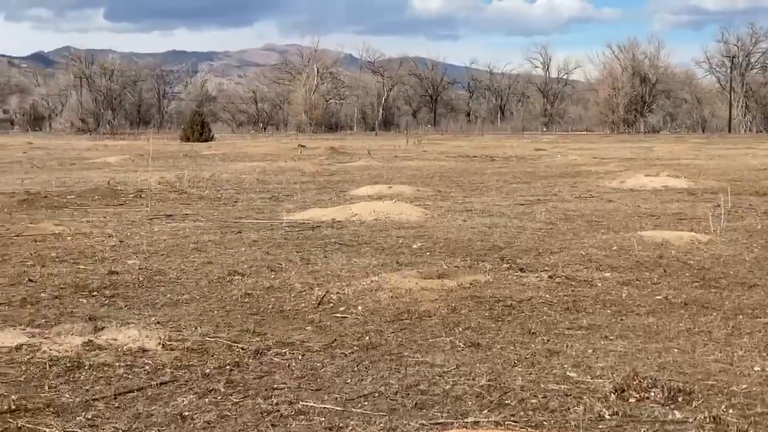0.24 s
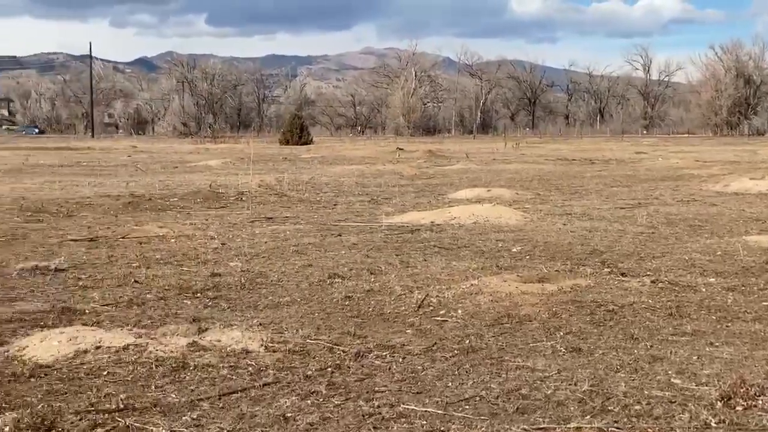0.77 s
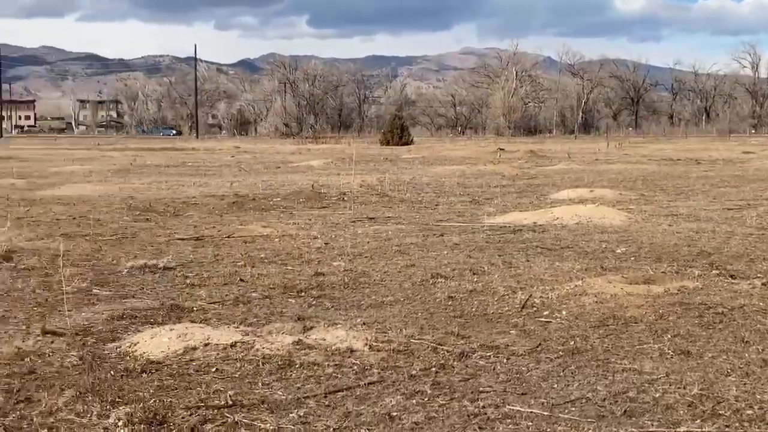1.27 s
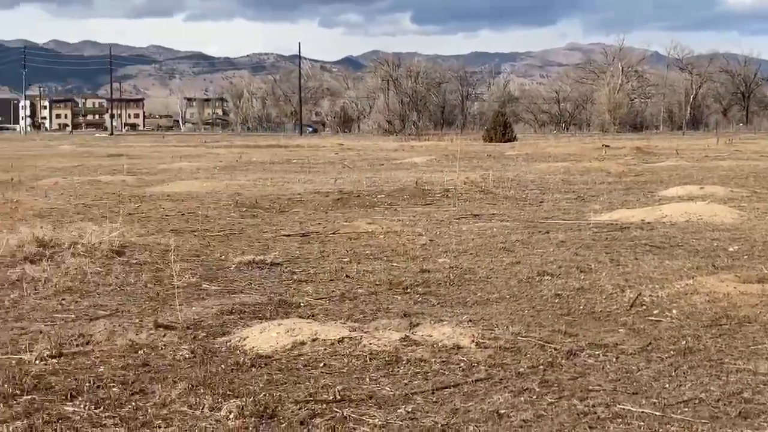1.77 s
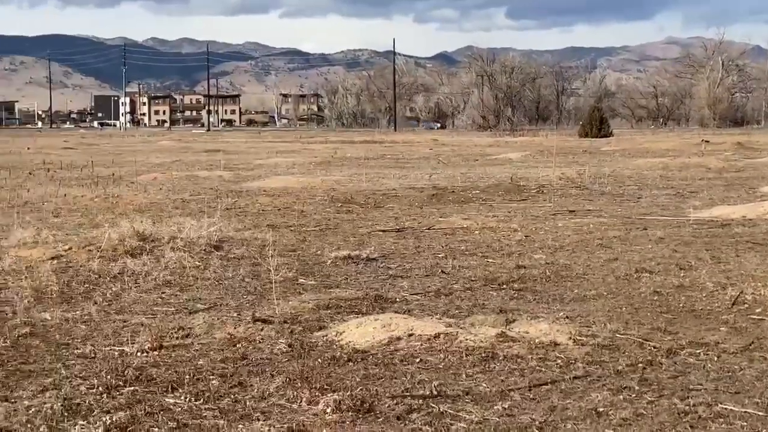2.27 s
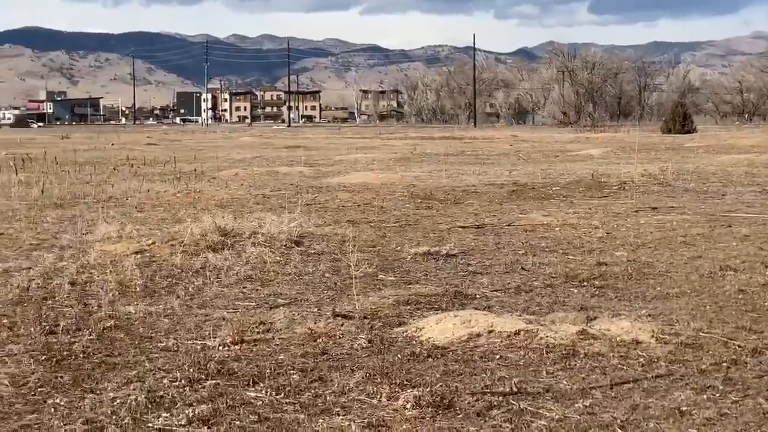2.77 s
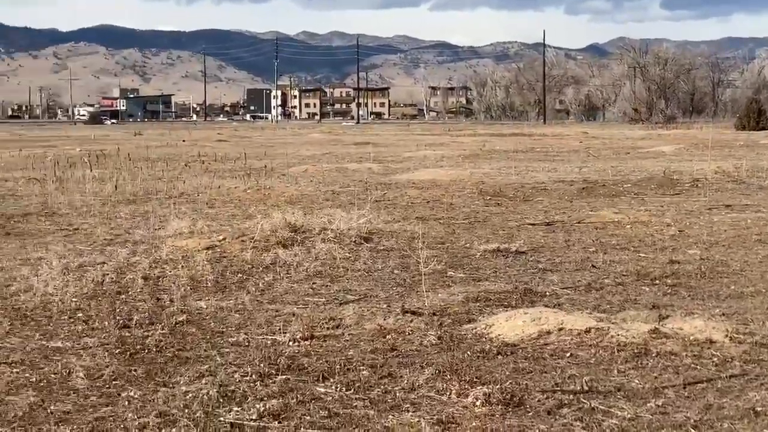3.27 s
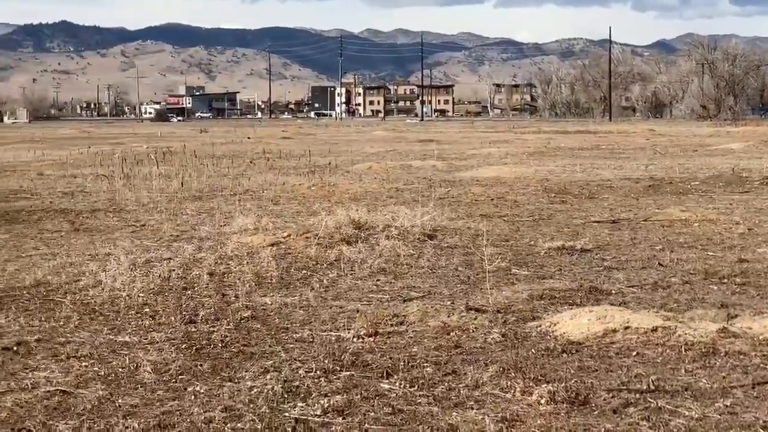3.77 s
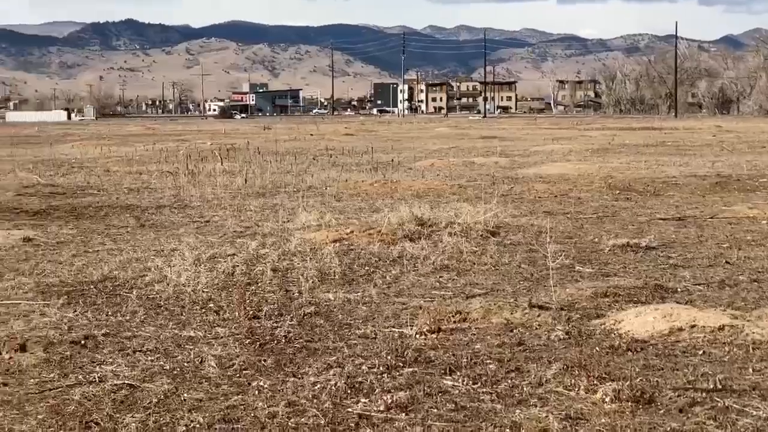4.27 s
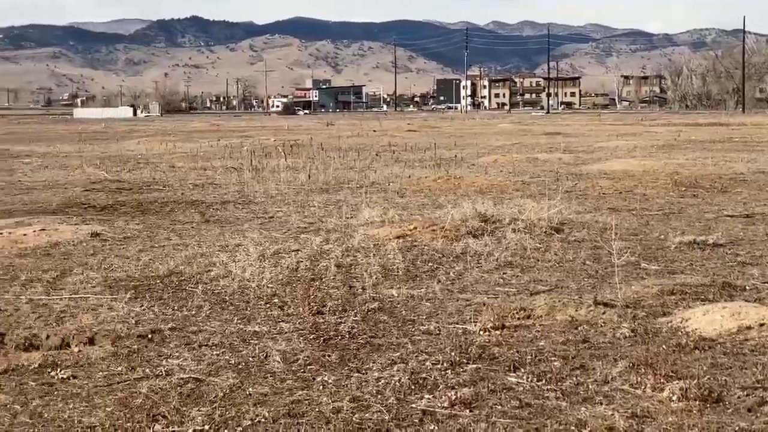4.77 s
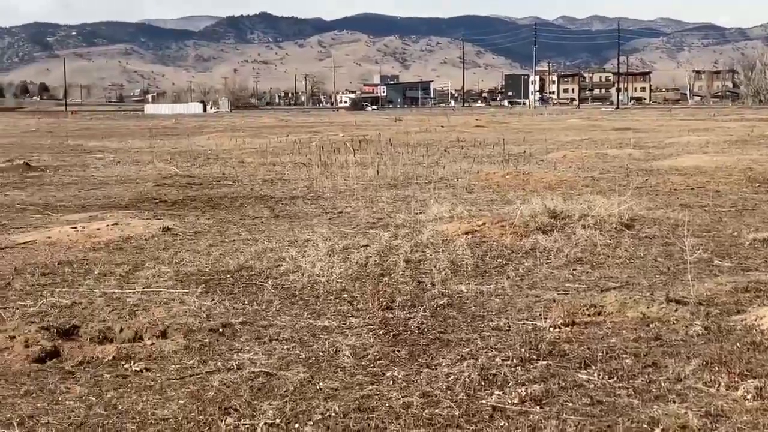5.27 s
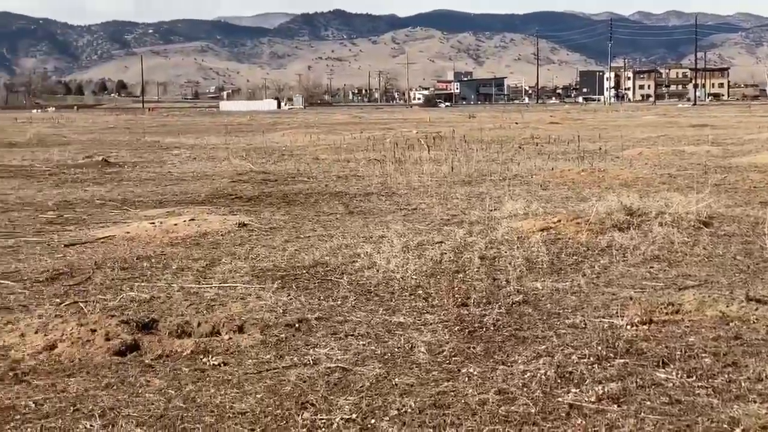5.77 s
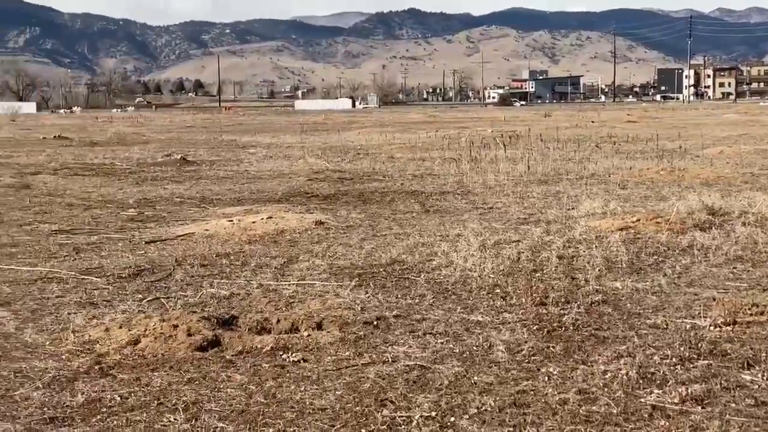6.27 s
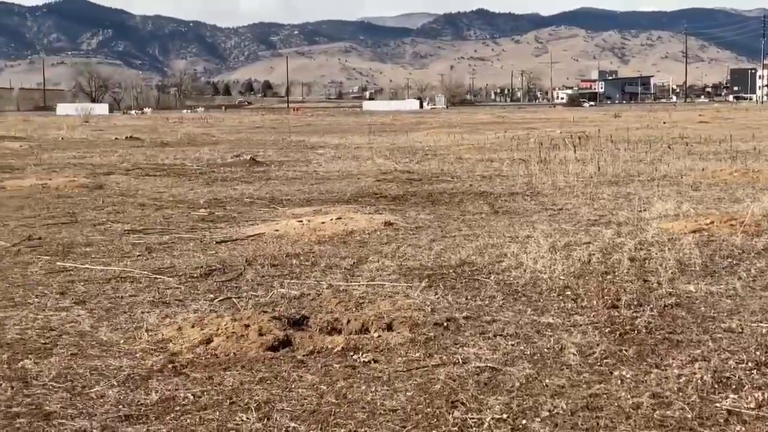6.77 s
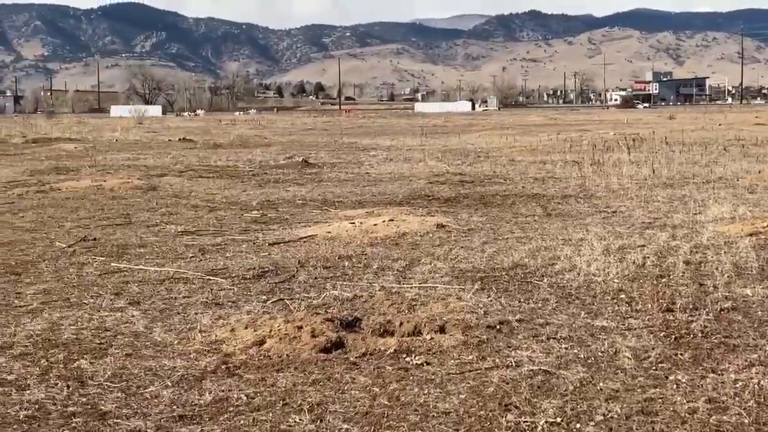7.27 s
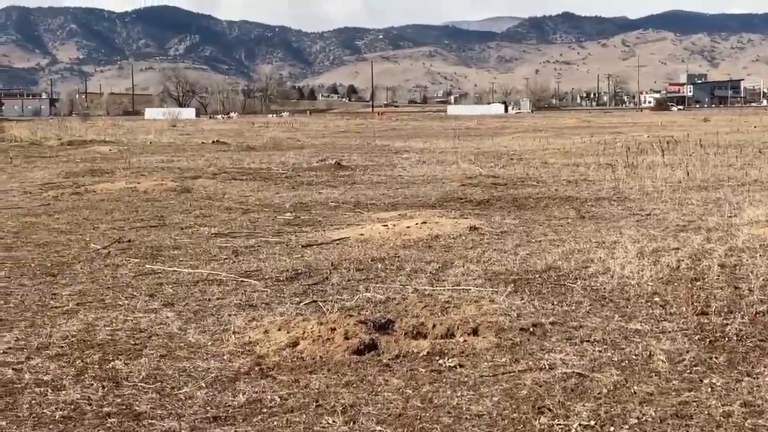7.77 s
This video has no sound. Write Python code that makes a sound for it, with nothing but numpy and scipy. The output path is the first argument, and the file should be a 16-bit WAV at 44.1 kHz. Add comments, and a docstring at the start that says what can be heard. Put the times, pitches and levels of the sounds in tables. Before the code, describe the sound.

A prairie dog gives twelve short, high two-note alarm barks over faint distant traffic, a low engine rumble that fades, and wind thumps on the microphone.

```python
"""Prairie dog alarm in an open field

A prairie dog barks two-note alarm calls, built from harmonics; far trees send back a faint noisy echo.
Coloured noise makes the distant traffic, low tones and rumble the engine, short gliding tones the chirps.
Wind reaches the microphone as low, lumpy noise and short thumps.
A low cut slides up and down and thins the bass."""
import sys
import numpy as np
from scipy import signal
from scipy.fft import rfft, irfft, next_fast_len
from scipy.io import wavfile
from scipy.ndimage import uniform_filter1d

SR = 44100
rng = np.random.default_rng(int(sys.argv[2]) if len(sys.argv) > 2 else 0)


def linear_from_db(decibels):
    """Turn decibels (scalar or array-like) into linear amplitude factors; 0 gives 1."""
    return 10 ** (np.asarray(decibels, float) / 20)


def materialize(psi):
    """Save the field psi as 16-bit PCM at rate SR to the path in sys.argv[1].

    A 1-D psi becomes a single channel; in a 2-D psi each row is a channel.
    """
    bounded = np.clip(np.atleast_2d(psi).T, -1, 1)
    quanta = np.round(bounded * 32767).astype(np.int16)
    wavfile.write(sys.argv[1], SR, quanta)


N = 354123  # length of the scene in samples


def rms_one(x):
    """Scale a signal to an rms (average strength) of 1."""
    return x / np.sqrt(np.mean(np.abs(x) ** 2) + 1e-20)


def in_time(rows, t=None):
    """Join the rows of a table with straight lines; read each column at every sample, or at times t."""
    if t is None:
        t = np.arange(N) / SR
    times, *columns = np.transpose(rows)
    return [np.interp(t, times, column) for column in columns]


def at_hz(points, hz):
    """Read a spectrum table on a log-frequency axis."""
    table_hz, values = np.array(points).T
    return np.interp(np.log(hz), np.log(table_hz), values)


def drift(rate_hz, size=N):
    """Slow random wandering with an rms of 1: noise smoothed twice by a one-pole low-pass."""
    r = np.exp(-2 * np.pi * rate_hz / SR)
    noise = rng.standard_normal(size + SR)
    # the first second lets the filter settle and is thrown away
    return rms_one(signal.lfilter([1], [1, -2 * r, r * r], noise)[SR:])


def band(x, low_hz, high_hz):
    """Keep the frequencies between two edges (second-order band-pass design)."""
    return signal.sosfilt(signal.butter(2, [low_hz, high_hz], "band", fs=SR, output="sos"), x)


def jitter(width_hz, size):
    """Complex noise with a steep edge: a band of that half-width around any tone it multiplies."""
    white = rng.standard_normal((2, size + 400))
    low_pass = signal.butter(4, width_hz, fs=SR, output="sos")
    real, imaginary = signal.sosfilt(low_pass, white)[:, 400:]
    return rms_one(real + 1j * imaginary)


def traffic():
    """Distant road hum: smooth stereo noise, coloured and spread by frequency, swelling a little."""
    # loudness and place of the road: (time [s], level [dB], left minus right [dB])
    road_path = [(0.0, -61.5, -1.5), (0.7, -63.5, -1), (1.32, -63, -1.5), (2.84, -63, -1), (3.6, -62.5, 1),
                 (4.9, -65, 0.0), (5.5, -64, 0), (6.91, -66, 0), (7.54, -67, -1), (8.03, -66.5, -0.5)]
    # colour of the road noise: (frequency [Hz], relative level per Hz [dB])
    road_colour = [(60, -29.5), (130, -12.5), (200, -10), (330, -16.5), (540, -17), (820, -12), (1100, -17),
                   (1700, -19.5), (2110, -32), (2450, -42), (2900, -51.5), (7100, -56.5), (8500, -60.5),
                   (10200, -55.5), (11500, -83.5)]
    # how alike the two channels are: (frequency [Hz], likeness [1 = same, 0 = unrelated])
    likeness = [(130, 0.94), (300, 0.56), (600, 0.1), (850, 0.34), (1400, 0.17), (2200, 0.31), (3500, 0.7),
                (7000, 0.72), (9000, 0.027)]
    level_db, pan_db = in_time(road_path)
    size = next_fast_len(N)
    hz = np.maximum(np.arange(size // 2 + 1) * SR / size, 1)
    alike = np.clip(at_hz(likeness, hz), -1, 1)
    shares = np.sqrt([1 + alike, 1 - alike])
    spectra = rfft(rng.standard_normal((2, size))) * linear_from_db(at_hz(road_colour, hz)) * shares
    mid, side = irfft(spectra, size)[:, :N]
    swell_db = 0.66 * drift(6.4)
    gain = linear_from_db(level_db + swell_db + pan_db * [[.5], [-.5]])
    # the level refers to the shared part between 500 and 1300 Hz
    return gain * (mid + side * [[1], [-1]]) / np.std(band(mid, 500, 1300))


def engine():
    """Low multiples of the firing rate, most wavering in level, over a rumble; the second one throbs."""
    # speed and loudness: (time [s], firing rate [Hz], relative level [dB])
    firing = [(0, 40.5, -47), (.8, 39.8, -47.5), (1.6, 40.87, -48), (2.5, 41.04, -46), (3.2, 41.09, -49.5),
              (3.5, 41.1, -54.5), (3.7, 42, -87.5), (8.03, 41.6, -74.5)]
    # tones of the exhaust pipe: (multiple of the firing rate, relative level [dB], waver [dB])
    pipe = [(1, -9.5, 5.5), (2, 1.5, 5), (3, 0, 3), (4, -10, 4), (5, -26, 0), (6, -32.5, -2),
            (8, -32.5, -3), (9, -37, 2)]
    throb_per_s, throb_peak_s, throb_depth = 4.8, 2.05, .45
    hz, level_db = in_time(firing)
    phase = 2 * np.pi * np.cumsum(hz * (1 + 0.0035 * drift(2.3))) / SR
    since_peak = np.arange(N) / SR - throb_peak_s
    throb = 1 + throb_depth * np.cos(2 * np.pi * throb_per_s * since_peak)
    tones = np.zeros(N)
    for k, db, waver_db in pipe:
        tone = linear_from_db(db + waver_db * drift(13.0)) * np.sin(k * phase + rng.uniform(0, 7))
        tones += tone * (throb if k == 2 else 1)
    rumble = linear_from_db(-3.5) * rms_one(band(rng.standard_normal(N), 44, 85))
    rumble += linear_from_db(-12.5) * rms_one(band(rng.standard_normal(N), 63, 180))
    # the scattered part has opposite sign in the two channels
    spread = linear_from_db(-13.0) * rms_one(band(rng.standard_normal(N), 40, 140)) * [[1], [-1]]
    return linear_from_db(level_db) * (tones + rumble + spread) * linear_from_db([[-.4], [.4]])


def weak_thumps():
    """Weak wind thumps at random moments: rows (time [s], size [dB], frequency [Hz])."""
    count, from_s, to_s = 27, 3.75, 7.8
    when = rng.random(count)
    size, colour = rng.standard_normal((2, count))
    times = from_s + (to_s - from_s) * when
    size_db = -52 + 1.5 * size
    hz = 273 * 2 ** (0.33 * colour)  # spread of a third of an octave
    return list(zip(times, size_db, hz))


def wind():
    """Eddies on the microphone ports: lumpy low noise, partly its own per channel, and short thumps."""
    # strength of the rumble: (time [s], relative level [dB])
    gusts = [(2.4, -46), (2.9, -38), (3.26, -43.5), (3.37, -59), (3.47, -46), (3.83, -63), (4.25, -74),
             (4.42, -56.5), (4.7, -72), (4.85, -65), (6.07, -70), (6.48, -56.5), (6.62, -68.5), (7.2, -62),
             (7.28, -52), (7.4, -59.5), (7.7, -47.5), (7.89, -45), (8.03, -74)]
    # the strong thumps: (time of the middle [s], size [dB], frequency [Hz])
    strong_thumps = [(2.586, -33.5, 169), (2.6502, -37, 140), (2.719, -36.5, 142), (2.8128, -31, 79),
                     (2.9023, -30, 152), (2.9468, -33, 157), (3.094, -32, 92), (3.2263, -39, 142),
                     (3.457, -34.5, 122), (3.522, -42, 207), (3.5678, -39.5, 214), (3.7066, -40.5, 238),
                     (3.8093, -44, 211), (3.9846, -44.5, 233), (4.0716, -40.5, 360), (4.0956, -46, 465),
                     (4.1591, -45, 323), (4.4517, -44, 374), (4.6358, -47, 504), (5.3749, -46, 361),
                     (5.4358, -51, 315), (6.0382, -47.5, 307), (6.16, -51, 264), (6.4995, -47.5, 392),
                     (7.0238, -49.5, 206), (7.0882, -46.5, 157), (7.262, -47, 188), (7.303, -46.5, 233),
                     (7.695, -40, 95), (7.8685, -40, 147)]
    gust_db, = in_time([(gusts[0][0] - .1, -90)] + gusts)
    lumps = linear_from_db(4.5 * drift(14))
    shared, apart = band(rng.standard_normal((2, N)), 38, 110) * lumps
    rumble = np.array([shared + 0.35 * apart, shared - 0.56 * apart])
    rumble = linear_from_db(gust_db - 4.0) * rms_one(rumble)

    thumps = np.zeros((2, N))
    t = np.arange(-2000, 2000) / SR
    for s, db, hz in strong_thumps + weak_thumps():
        turn, pan = rng.standard_normal(2)  # random wave shape and left-right place
        fade = np.exp(-(t * hz / 0.69) ** 2)
        pulse = linear_from_db(db) * fade * np.cos(2 * np.pi * hz * t + 2 * turn)
        sides = linear_from_db(0.42 * pan * np.array([[1], [-1]]))
        thumps[:, round(s * SR) - 2000:][:, :len(t)] += pulse * sides
    return rumble, thumps


def chirps():
    """Faint far chirps: short whistles whose pitch glides fast at first, then settles."""
    # (start [s], length [s], start pitch [Hz], end pitch [Hz], level [dB])
    whistles = [(6.097, .042, 3050, 2890, -79), (6.455, .02, 2950, 2750, -86),
                (4.715, .022, 3200, 3300, -85), (7.522, .036, 3250, 2900, -87),
                (7.558, .014, 3350, 3750, -90)]
    out = np.zeros(N)
    for s, length_s, start_hz, end_hz, db in whistles:
        u = np.linspace(0, 1, int(length_s * SR))
        glide_hz = end_hz + (start_hz - end_hz) * (1 - u) ** 3
        swell = np.sin(np.pi * u) ** .5
        whistle = linear_from_db(db) * swell * np.sin(2 * np.pi * np.cumsum(glide_hz) / SR)
        out[round(s * SR):][:len(u)] += whistle
    return out


def field(x):
    """Grass, mounds and trees scatter each bark back in clumps of noisy, dulled echo."""
    # clumps of echo: (delay [s], spread [s], relative level [dB])
    echoes = [(.012, .012, -31), (.075, .03, -37), (.145, .028, -32.5), (.23, .04, -42)]
    t = np.arange(SR // 2) / SR
    clumps = np.zeros(len(t))
    for delay_s, spread_s, db in echoes:
        bump = np.exp(-.5 * ((t - delay_s) / spread_s) ** 2)
        clumps += linear_from_db(db) * bump / np.sqrt(spread_s * SR)
    noise = band(rng.standard_normal((2, len(t))), 1500, 4100)
    shared, apart = noise * clumps * linear_from_db(2 + 4 * drift(60, size=len(t)))
    responses = [shared + .4 * apart, shared - .4 * apart]
    return signal.fftconvolve(x[None], responses, axes=1)[:, :N]


def two_notes(first, gap, second):
    """One bark as two arches with a break between: rows (time [s], pitch [Hz], level [dB], roughness)."""
    s, onset_hz, rise_s, hz, db = first
    break_s, break_hz, break_db, rasp, rough2 = gap
    end, hz2, db2, *_ = second
    silent_db, edge_s = -88, .003  # a bark snaps on and off
    clear, edge_rough = .02, .15
    onset_s, fade_s = 0.0054, .012
    climb = np.sqrt((onset_s - edge_s) / (rise_s - edge_s))
    hold_s = 0.32 * (break_s - s - rise_s)  # the first note keeps its level this long after its top
    back = break_s + .012  # the voice returns after the break
    top = back + 0.67 * (end - fade_s - back)
    back_hz = .2 * break_hz + .8 * hz2
    back_db = 0.24 * break_db + 0.76 * db2
    end_hz = hz2 * (1 - .055)
    return [(s, onset_hz, silent_db, clear),
            (s + edge_s, onset_hz, db - 6.5, edge_rough),
            (s + onset_s, onset_hz + (hz - onset_hz) * climb, db, clear),
            (s + rise_s, hz, db, clear),
            (s + rise_s + hold_s, hz - .25 * (hz - break_hz), db, rasp / 4),
            (break_s, break_hz, break_db, rasp),
            (back, back_hz, back_db, rough2 + rasp / 6),
            (top, hz2, db2, rough2),
            (end - fade_s, hz2 * (1 - .025), db2 - 4, rough2 / 2),
            (end - edge_s, end_hz, db2 - 9, edge_rough),
            (end, end_hz, silent_db, clear)]


def bark(rows, flutter_db, tilt_db):
    """Harmonics through the throat; a slower flutter of the vocal folds adds side tones, rasp blurs them."""
    # colour of throat and mouth: (frequency [Hz], gain [dB])
    throat = [(1400, -2.5), (1900, 8), (2600, -8), (3400, -1.5), (4500, -15.5), (5500, -6), (6300, -4.5),
              (7000, -11), (7700, -27.5), (8500, -37.5), (9600, -19), (10800, -37.5)]
    t = np.arange(rows[0][0], rows[-1][0], 1 / SR)
    pitch, level_db, rough = in_time(rows, t)
    pitch = uniform_filter1d(pitch, size=SR // 250, mode="nearest")
    # slack folds lower the pitch at both ends
    pitch = pitch * (1 - .055 * np.exp(-(t - t[0]) / 0.0033) - .055 * np.exp((t - t[-1]) / 0.0031))
    first_note = 1 / (1 + np.exp((t - t[0] - .019) / .003))  # from near 1 at the start down to 0
    effort = np.clip((level_db + 73) / 15, 0, 1)  # soft notes are purer and duller
    rough = rough * (.35 + .65 * effort)
    steady = 1 - np.clip(rough + .025 * effort * (1 - first_note), .003, .95)
    phase = 2 * np.pi * np.cumsum(pitch) / SR

    flutter_hz = 298.6 * (1 + .05 * drift(30, size=len(t)))
    flutter = np.exp(2j * np.pi * np.cumsum(flutter_hz) / SR)
    # one side tone above each harmonic and one 9 dB weaker below it
    side_tones = linear_from_db(flutter_db) * flutter + linear_from_db(flutter_db - 9) / flutter
    folds = 1 + effort * (1 - first_note) * side_tones

    fundamental_db = -11.1 + 3.18 * first_note
    slope_db = tilt_db - 3.0 * (1.5 - effort) * (2 - first_note)  # per harmonic above the second
    spread = np.clip(1.5 * rough, .04, 1)  # rougher voice, wider rasp
    voice, power = 0, 0
    for k in range(1, 8):
        clear = steady ** (k * k / 4)  # jitter blurs the upper harmonics most
        narrow, wide = jitter(380, size=len(t)), jitter(850, size=len(t))
        rasp = np.sqrt(1 - spread) * narrow + np.sqrt(spread) * wide
        gain_db = at_hz(throat, k * pitch) + slope_db * max(k - 2, 0)
        gain_db = gain_db - 1.0 * first_note * (k % 2)  # odd harmonics a little weaker early on
        gain = linear_from_db(gain_db + fundamental_db * (k == 1))
        source = np.sqrt(clear) * folds + np.sqrt(1 - clear) * rasp
        voice = voice + gain * np.real(source * np.exp(1j * k * phase))
        power = power + (k > 1) * gain ** 2  # the level is set without the fundamental
    return round(t[0] * SR), linear_from_db(level_db) * voice / np.sqrt(power)


def prairie_dog():
    """All barks on one track: each is a first note, a break of the voice and a second note."""
    # first note: (start [s], onset pitch [Hz], time to the top [s], top pitch [Hz], top level [dB])
    first_notes = [(0.41, 1630, .009, 1743, -62.5), (1.509, 1633, .015, 2074, -57),
                   (1.872, 1677, .01, 1831, -53), (2.575, 1745, .011, 1825, -55),
                   (3.286, 1830, 0.012, 1836, -53.5), (3.972, 1670, .012, 1824, -55),
                   (4.736, 1590, .011, 1683, -56), (5.559, 1700, 0.0083, 1804, -51.5),
                   (6.259, 1530, .01, 1600, -58), (6.682, 1688, .009, 1840, -49.5),
                   (7.096, 1580, .008, 1673, -55), (7.621, 1605, .007, 1688, -56.5)]
    # break: (time [s], pitch [Hz], level [dB], roughness [0-1], roughness that stays after it [0-1])
    breaks = [(0.431, 1300, -84, .6, .02), (1.538, 1860, -53, .75, .16), (1.896, 1740, -53.5, .55, .13),
              (2.604, 1570, -58, .25, .05), (3.312, 1480, -70, .7, .02), (3.995, 1380, -71, .6, .03),
              (4.759, 1528, -58.5, .15, .02), (5.584, 1350, -72, .65, .01), (6.284, 1230, -74, .6, .02),
              (6.708, 1470, -65, .8, .03), (7.119, 1430, -58.7, .3, .04), (7.646, 1390, -61, .25, .04)]
    # second note, then two settings of the whole bark:
    # (end [s], top pitch [Hz], top level [dB], flutter [dB], brightness [dB per harmonic])
    second_notes = [(0.466, 1535, -65.5, -11, .6), (1.626, 1700, -52.5, -15, -1.6),
                    (1.954, 1647, -51.5, -11, 0.1), (2.644, 1592, -55, -8.5, 0),
                    (3.359, 1623, -54, -11.5, 1.2), (4.038, 1572, -56, -7, 0.3),
                    (4.802, 1610, -53, -8, 1.8), (5.63, 1594, -53.5, -14, 1.8), (6.32, 1560, -53, -9, 0.5),
                    (6.746, 1616, -51.3, -7, 2.6), (7.162, 1562, -56, -4, 1.3), (7.681, 1524, -57, -5.5, 1)]
    out = np.zeros(N)
    for first, gap, second in zip(first_notes, breaks, second_notes):
        flutter_db, tilt_db = second[-2:]
        at, voice = bark(two_notes(first, gap, second), flutter_db, tilt_db)
        out[at:at + len(voice)] += voice
    return out


def scene():
    """Add up the animal, its echo, the chirps, the road, the engine and the wind."""
    dog = prairie_dog()
    # the right port hears it about half a sample later
    late = np.interp(np.arange(N) - .48, np.arange(N), dog)
    direct = [dog, late] * linear_from_db([[-.6], [.6]])
    rumble, thumps = wind()
    return direct + field(dog) + chirps() + traffic() + engine() + rumble + thumps


def low_cut(x):
    """A steep high-pass whose edge moves, applied to the spectrum of short overlapping frames."""
    # path of the edge before the waver, the drops and the scaling below: (time [s], frequency [Hz])
    edge_path = [(0, 21.45), (3.3, 22), (3.55, 30), (3.66, 95), (4.0, 126), (4.13, 216), (4.34, 226),
                 (4.45, 119), (4.67, 187), (5.3, 124.1), (5.76, 170), (6.4, 137), (6.55, 234), (6.86, 214),
                 (7.0, 135), (7.28, 95), (7.42, 130), (8.03, 110)]
    # the edge drops for a moment and lets bass through: (time [s], half-width [s], depth [octaves])
    edge_drops = [(4.39, 0.018, 1.5), (5.15, 0.13, 1.2), (6.48, 0.029, 1.9), (6.925, .025, 3.1),
                  (7.45, 0.014, 0.62), (7.71, 0.065, 1.4), (7.87, 0.028, 0.67)]
    steepness, leak_db = 5.0, -36  # the leak is what still passes far below the edge
    hz, s, frames = signal.stft(x, SR, nperseg=2048, noverlap=1536, nfft=4096)
    cut_hz, = in_time(edge_path, s)
    waver_octaves = 0.17 * np.interp(s * SR, np.arange(N), drift(13))
    drop_octaves = sum(depth * np.exp(-((s - at) / width) ** 4) for at, width, depth in edge_drops)
    cut_hz = 1.21 * cut_hz * 2 ** (waver_octaves - drop_octaves)
    passed = 1 / (1 + (cut_hz / (hz[:, None] + 1)) ** (2 * steepness))
    frames = frames * np.sqrt(linear_from_db(2 * leak_db) + passed)
    return signal.istft(frames, SR, nperseg=2048, noverlap=1536, nfft=4096)[1][:, :N]


def band_limit(x):
    """A steep low-pass at the top of the band."""
    return signal.sosfilt(signal.butter(12, 11500, fs=SR, output="sos"), x)


def record(dry):
    """Thin the bass with the low cut, then add a faint hiss."""
    hiss = linear_from_db(-106) * rng.standard_normal(dry.shape)
    mix = low_cut(dry) + hiss
    return band_limit(mix)


dry = scene()
out = record(dry)
materialize(out)
```